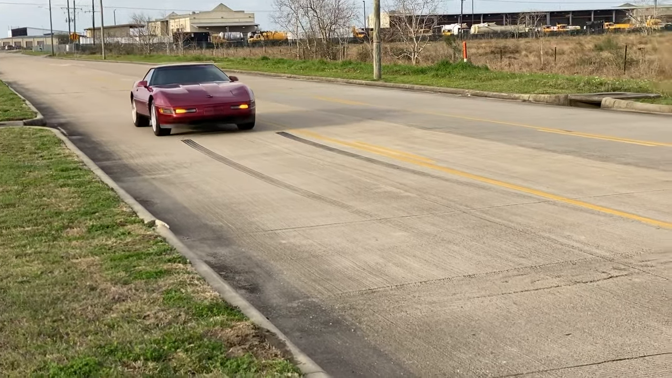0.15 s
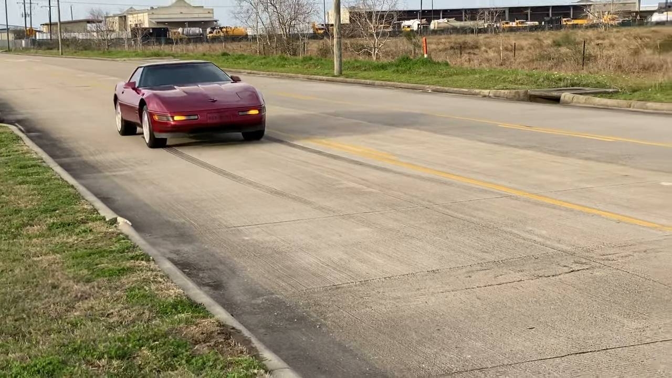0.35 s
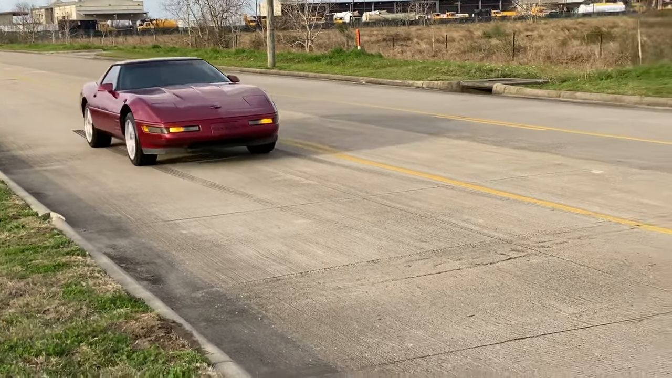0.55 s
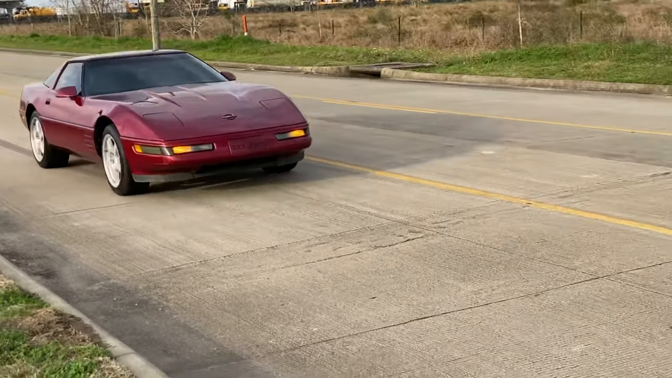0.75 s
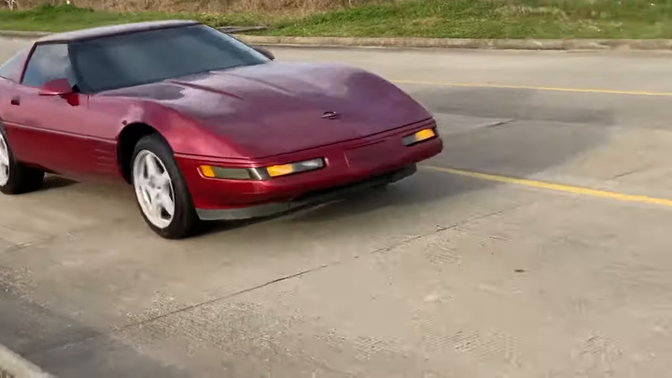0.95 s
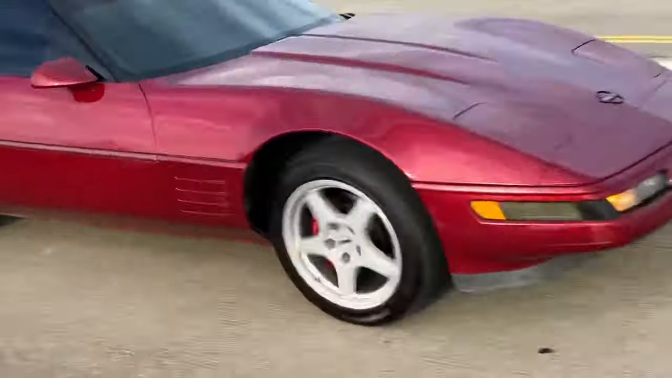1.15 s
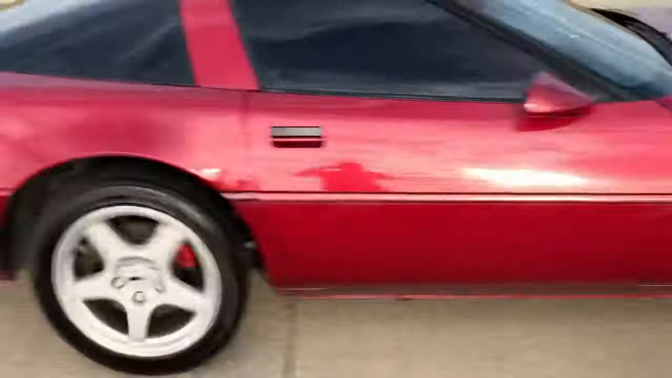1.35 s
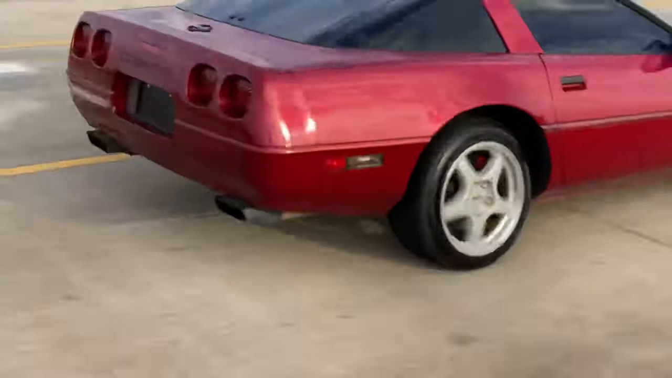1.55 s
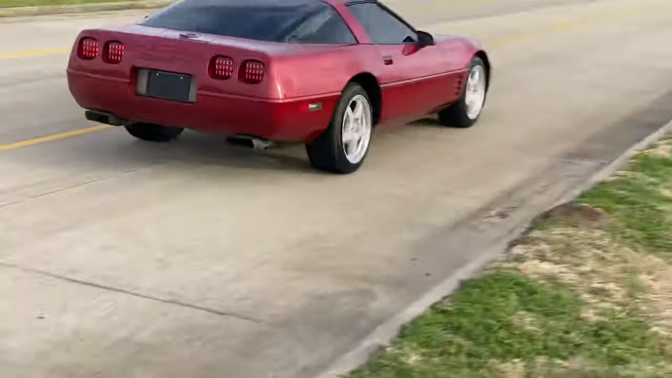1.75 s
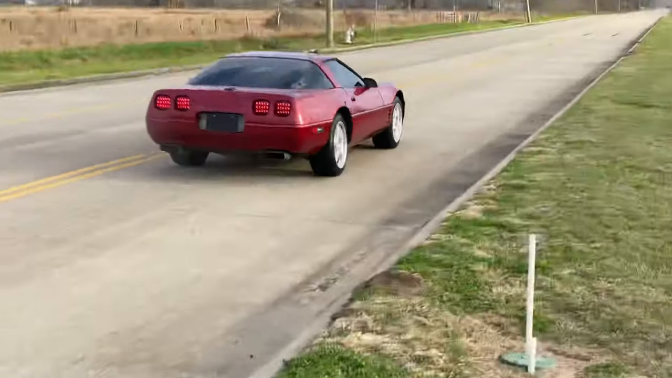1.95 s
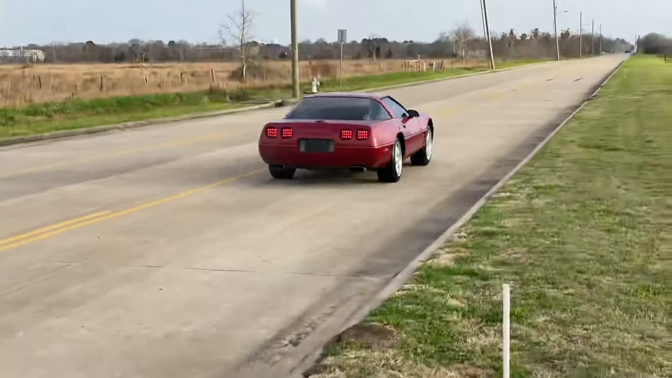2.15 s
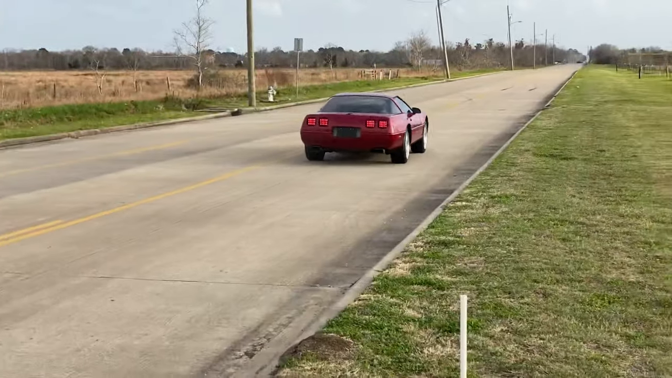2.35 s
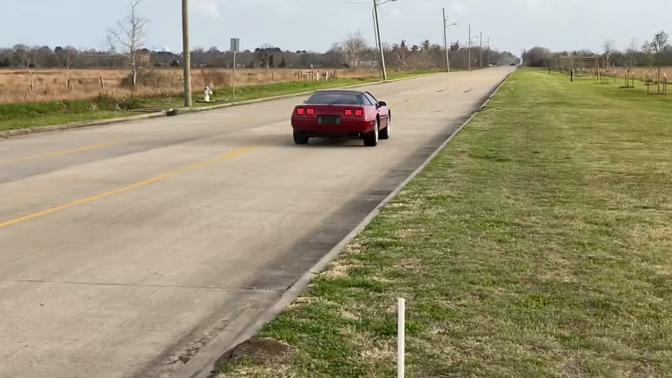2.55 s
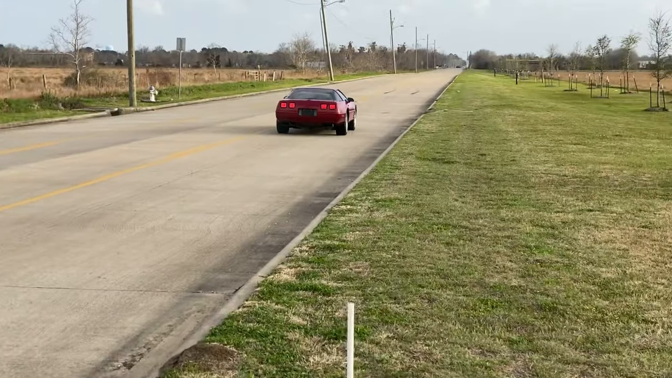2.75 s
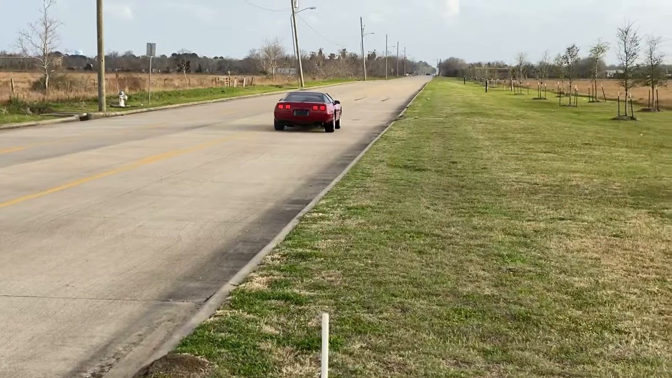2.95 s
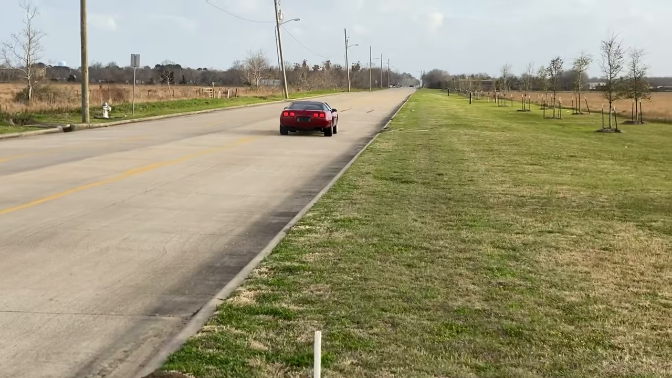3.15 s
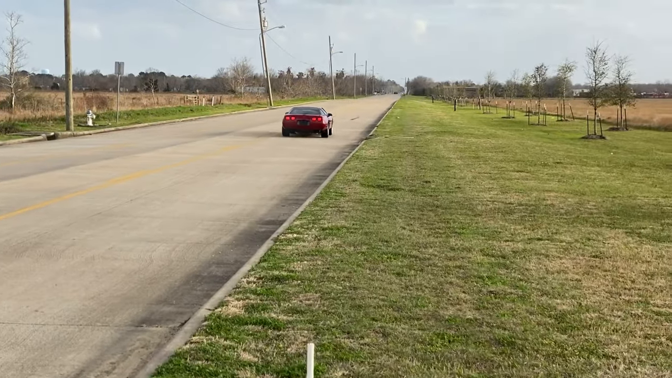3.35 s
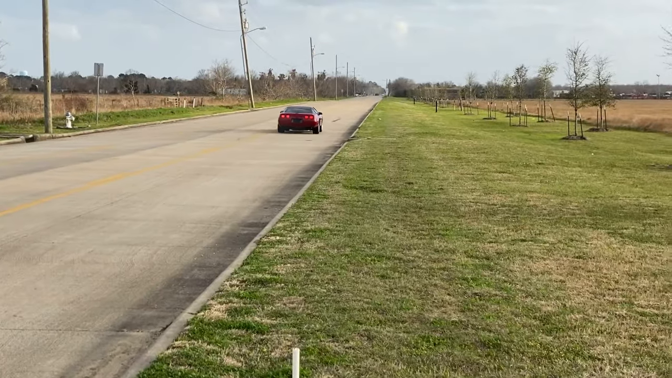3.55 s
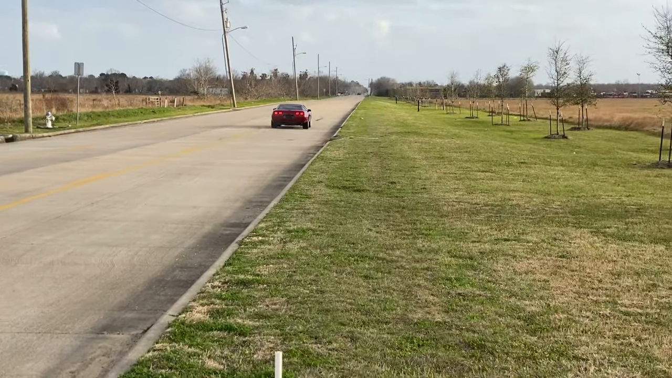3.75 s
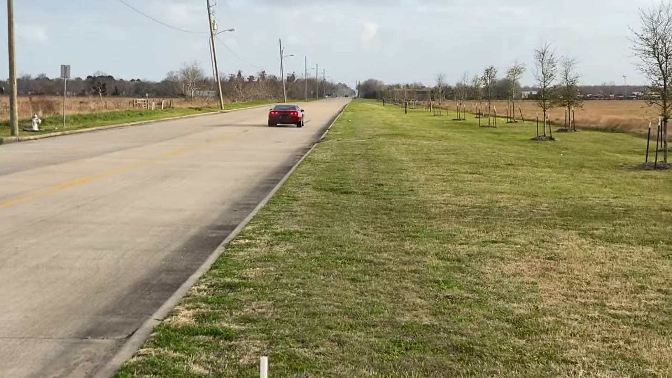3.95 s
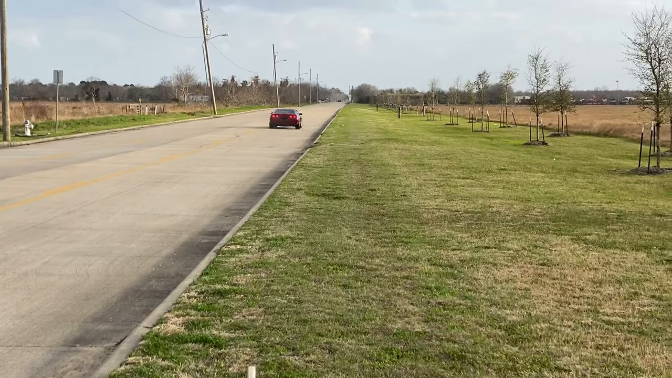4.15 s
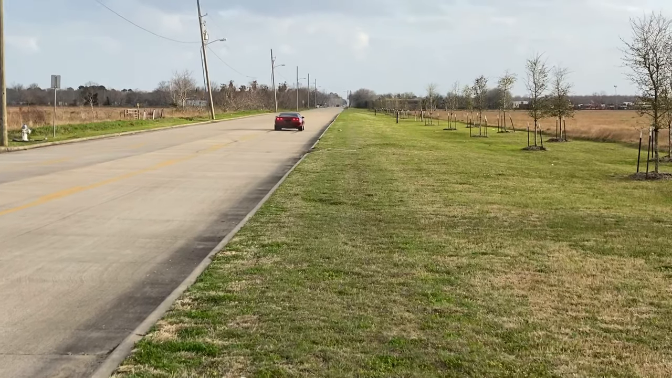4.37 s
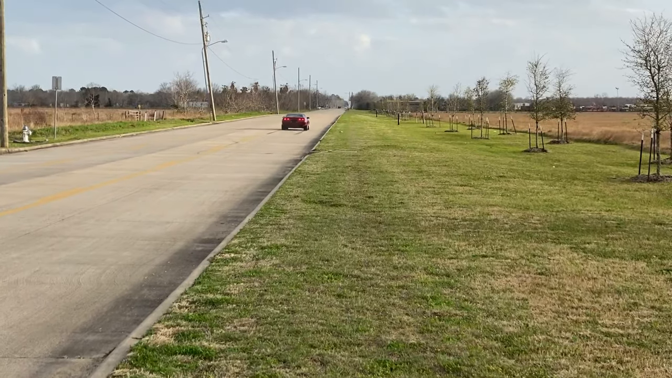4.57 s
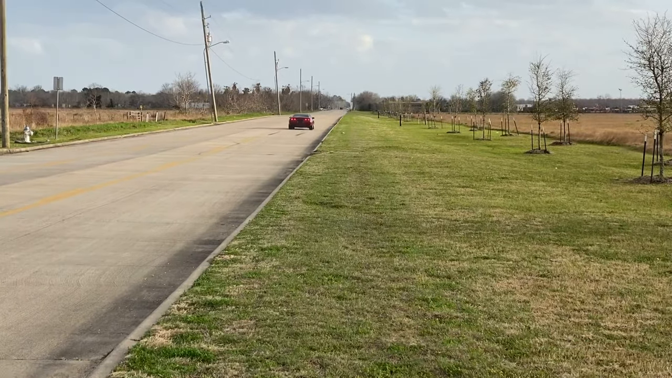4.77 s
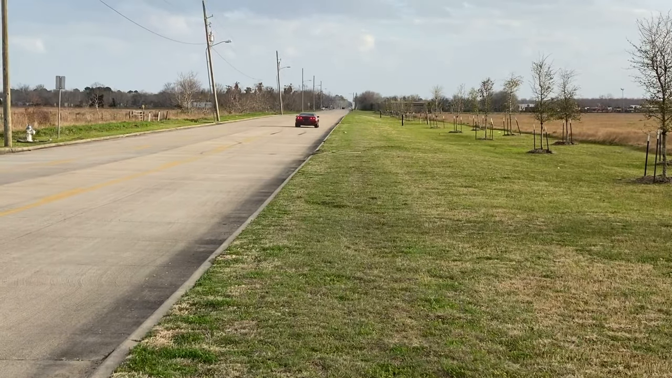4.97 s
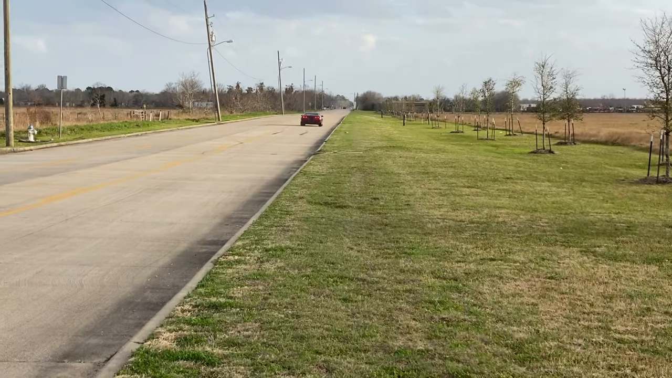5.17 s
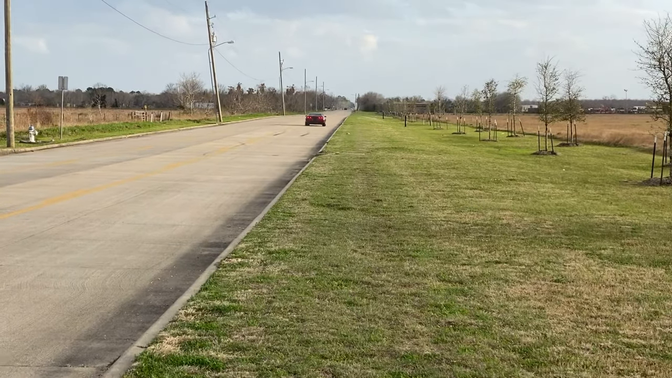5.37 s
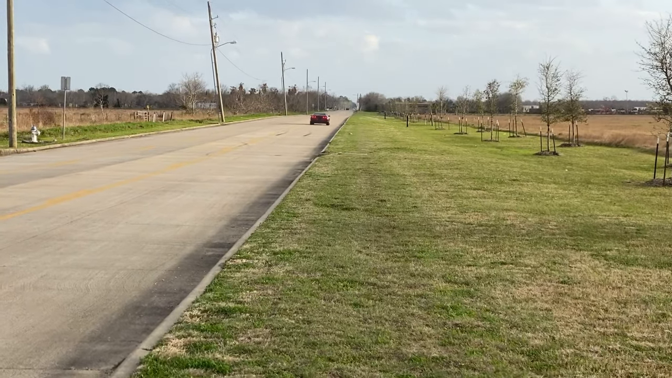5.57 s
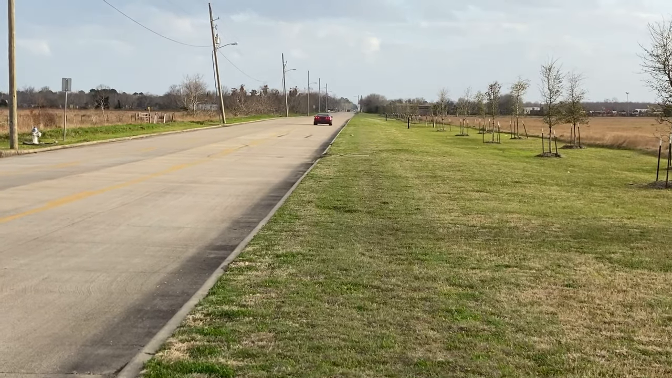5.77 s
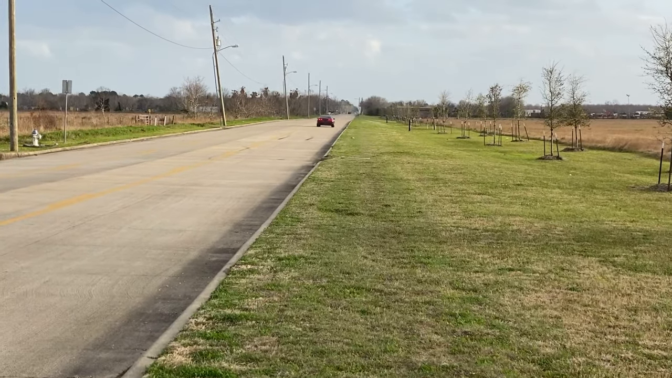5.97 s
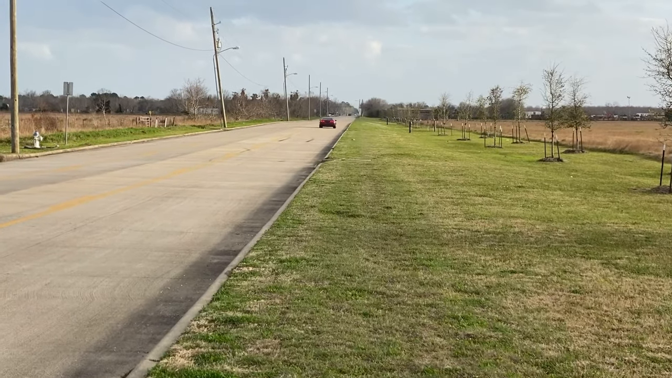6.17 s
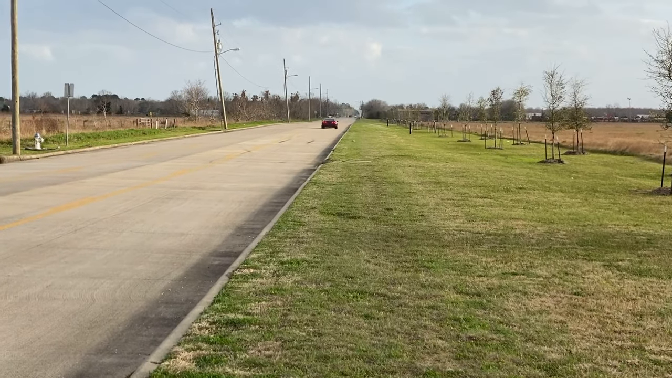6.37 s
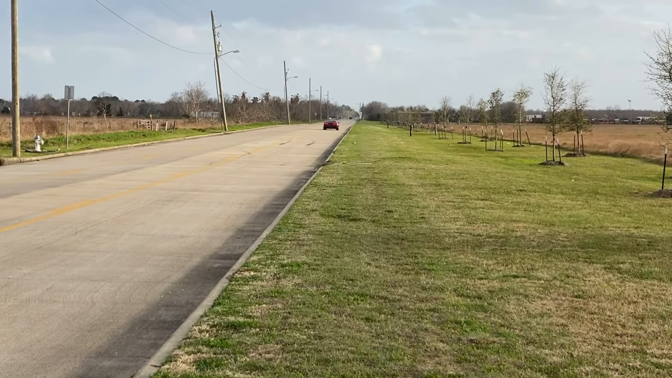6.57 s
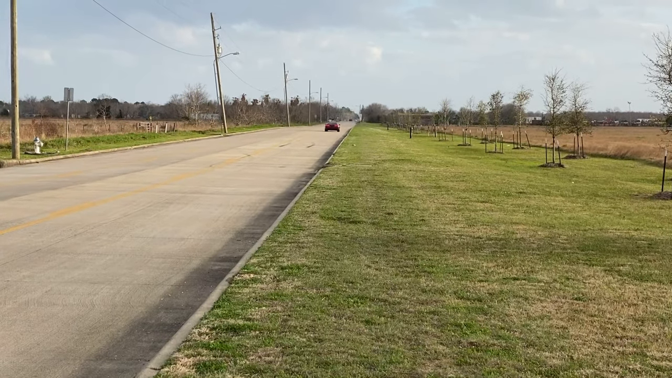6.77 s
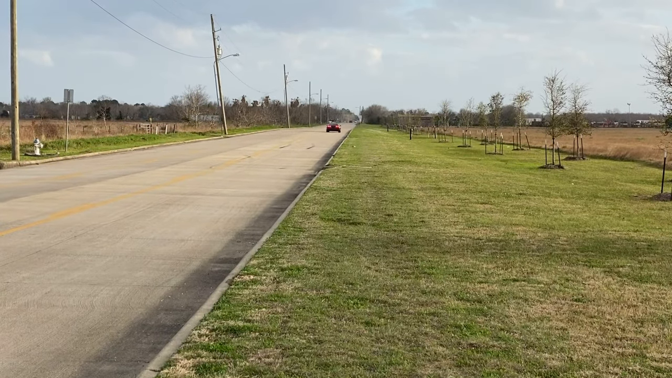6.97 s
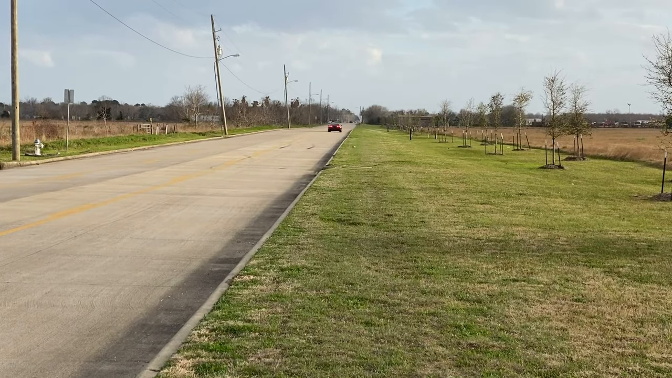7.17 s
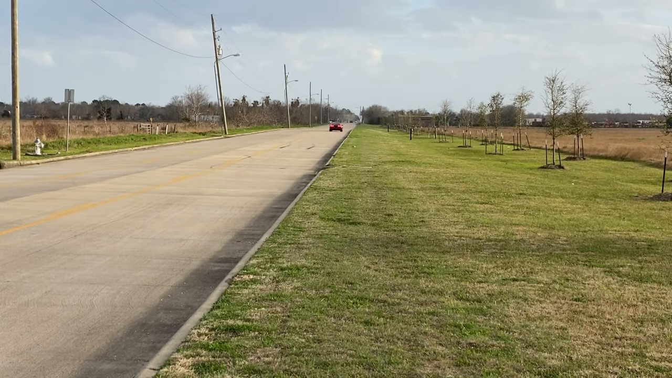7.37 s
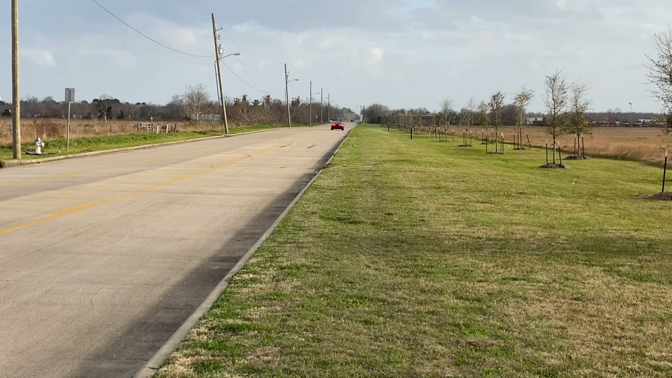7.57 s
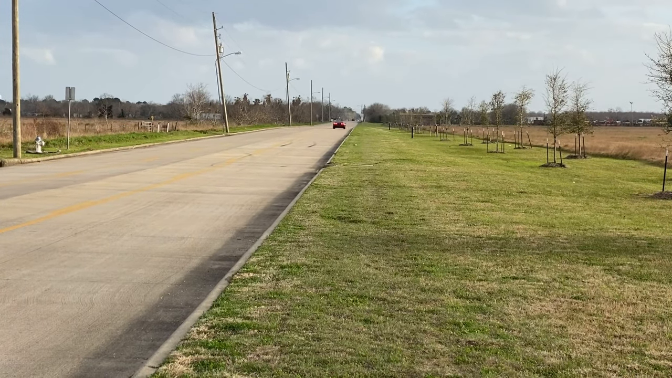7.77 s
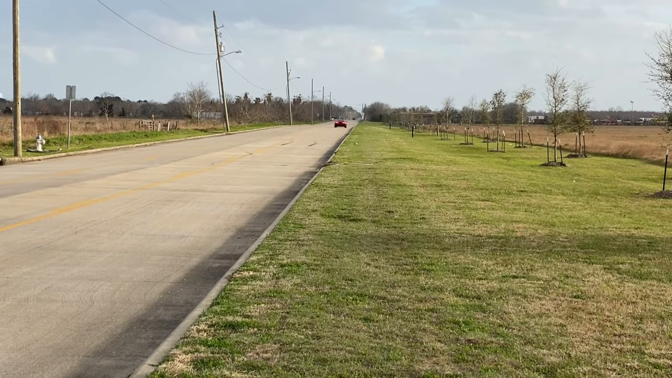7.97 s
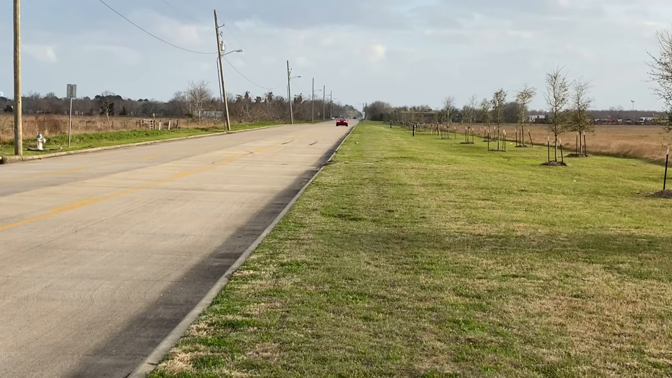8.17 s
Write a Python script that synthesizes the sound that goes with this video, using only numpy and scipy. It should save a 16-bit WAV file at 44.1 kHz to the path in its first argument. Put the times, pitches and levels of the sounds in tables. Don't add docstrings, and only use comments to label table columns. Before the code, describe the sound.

Outdoors beside an open concrete road, a V8 car with unmuffled pipes accelerates toward a stereo microphone, its deep hum and hard firing cracks rising in pitch. It sweeps past at just over a second with tyre hiss and a puff of wind. Pitch drops, two shifts bring sharp pops, and the roar shrinks into the distance. Finally the throttle closes and the engine coasts unevenly, crackling and backfiring.

```python
import sys
import numpy as np
from scipy import signal
from scipy.fft import rfft, irfft, next_fast_len
from scipy.io import wavfile
from scipy.ndimage import uniform_filter1d

SR = 44100
rng = np.random.default_rng(int(sys.argv[2]) if len(sys.argv) > 2 else 0)


def gain_from_decibels(decibels):
    exponent = np.asarray(decibels, float) / 20
    return 10 ** exponent


def unload_audio(sound):
    columns = np.transpose(np.atleast_2d(sound))
    steps = np.round(np.clip(columns, -1, 1) * 32767)
    wavfile.write(sys.argv[1], SR, steps.astype(np.int16))


N = 362485
WIDE = next_fast_len(N + 8192)


def evened(x):
    return x / np.sqrt(np.mean(x ** 2) + 1e-20)


def steady(x, s=0.047):
    size = int(s * SR)
    power = uniform_filter1d(uniform_filter1d(x ** 2, size), size)
    return x / np.sqrt(abs(power) + 1e-14)


def read(points, hz):
    f, value = np.transpose(points)
    return np.interp(np.log(hz + 1), np.log(f + 1), value)


def along(rows):
    s, *columns = np.transpose(rows)
    return [np.interp(np.arange(N) / SR, s, c) for c in columns]


def bell(s, length):
    return np.exp(-((np.arange(N) / SR - s) / length) ** 2)


def shaped(x, points):
    gain = gain_from_decibels(read(points, np.fft.rfftfreq(WIDE, 1 / SR)))
    return irfft(rfft(x, WIDE) * gain, WIDE)[:N]


def causal(points):
    log_gain = np.log(gain_from_decibels(read(points, abs(np.fft.fftfreq(4096, 1 / SR)))))
    return np.fft.ifft(np.exp(signal.hilbert(log_gain).conj())).real[:2048]


def band(x, lo_hz, hi_hz):
    sos = signal.butter(4, [lo_hz, hi_hz], "band", fs=SR, output="sos")
    return steady(signal.sosfilt(sos, x))


def wander(hz, count):
    rate = 100
    frames = rng.standard_normal((count, int(N / SR * rate) + 3, 2)) @ [1, 1j]
    frames = signal.lfilter([1], [1, -np.exp(-2 * np.pi * hz / rate)], frames, axis=1)
    at = np.arange(0, N, 8) * rate / SR
    return [np.interp(at, np.arange(len(f)), f / np.sqrt(np.mean(abs(f) ** 2))) for f in frames]


# t/s, f/Hz (engine cycles)
SPEED = [(0.0, 35.3), (0.18, 36.6), (0.62, 43.4), (1.2, 50.4), (1.31, 49.4), (1.64, 39.3), (1.845, 45.2),
         (1.95, 40.5), (2.28, 33.0), (2.39, 34.4), (3.31, 39.0), (4.25, 43.1), (4.37, 45), (4.97, 34.5),
         (5.27, 29), (5.45, 29.8), (7.85, 27.4), (8.22, 26.7)]
MARKS = [
    .215,
    2.9875,
    4.206,
    6.577,
    7.68,
]


def crank():
    turns = np.cumsum(along(SPEED)[0]) / SR
    marked = turns[(np.array(MARKS) * SR).astype(int)]
    drift = np.unwrap(marked % 1, period=1)
    return turns - np.interp(np.arange(N) / SR, MARKS, drift) + 1


EVEN_SHARE = .18
# start t/s, end t/s, added share of noise/0-1
BURBLES = [
    (-.2, .15, .22),
    (1.2, 1.36, .4),
    (1.2, 2.0, .06),
    (1.68, 1.76, .25),
    (4.3, 4.5, .5),
    (4.97, 5.45, .4),
    (5.45, 5.88, .2),
    (5.88, 6.45, .36),
]


def raggedness():
    t, edge, ragged = np.arange(N) / SR, .05, EVEN_SHARE
    for a, b, share in BURBLES:
        ragged = ragged + np.interp(t, [a - edge, a + edge, b - edge, b + edge], [0, share, share, 0])
    return ragged


PASS_S = 1.28
# t/s, level/dB, rasp/dB
DRIVE = [(0, -9.5, -16.5), (.17, -15.5, -10), (.45, -12.5, -18), (1.05, -11.5, -19), (1.4, -13, -15.5),
         (1.6, -17.5, -10), (1.9, -18.5, -11.5), (2.2, -22, -15), (2.75, -26.5, -14.5), (3.05, -28, -14),
         (4.25, -30, -13.5), (4.55, -31.5, -4), (4.92, -34, -7), (5.04, -41.5, -19), (5.3, -40, -25),
         (5.75, -40, -20), (6.42, -34, -10), (6.8, -36.5, -18), (8.22, -36, -10.5)]
# t/s, length/s, level change/dB, rasp change/dB
STUMBLES = [(1.241, 0.019, -2, -5), (1.3, 0.038, 3.5, -4), (1.328, 0.013, -8.5, 0.5), (1.657, 0.042, 1, -2),
            (1.731, 0.012, 7, -4), (1.717, 0.012, 4, -10.5), (1.173, 0.037, -2, 4.5), (.62, 0.1, 0.5, 1),
            (4.38, 0.029, -4, -7.5), (5.39, 0.38, 4, 10), (7.683, 0.088, -0.5, 3.5), (5.6, 0.093, -1, -4),
            (3.2, 0.05, 0, -3), (4.478, 0.017, -1.5, -14), (5.898, 0.0098, 13, -6),
            (5.993, 0.059, 4.5, 4.5), (6.165, 0.067, -0.5, 5.5), (6.179, 0.011, 11, -2),
            (6.252, 0.026, 3, -8)]
# t/s, index of the eight drone colours
ASPECT = [(.15, 0), (.45, 1), (.8, 1), (1.0, 2), (1.25, 2), (1.4, 3), (1.7, 3), (1.9, 4), (2.2, 4),
          (2.5, 5), (4.4, 5), (4.55, 6), (4.97, 6), (5.15, 7)]
BARK_DB = [
    8.5,
    8,
    6.5,
    9.5,
    18.5,
    2.5,
    0.5,
    -8,
]


def levels():
    (level_db, rasp_db), (aspect,) = along(DRIVE), along(ASPECT)
    bumps = np.array([bell(s, length) for s, length, *_ in STUMBLES])
    level_db, rasp_db = np.array([level_db, rasp_db]) + np.transpose(STUMBLES)[2:] @ bumps
    t = np.arange(N) / SR
    since = t - PASS_S
    far_db = 39 * (1 - np.exp(-abs(since) / 5.77)) + 5.5 * np.clip(-since, 0, 1)
    bark_db = rasp_db + np.interp(aspect, range(len(BARK_DB)), BARK_DB)
    bark_db -= 1.5 * raggedness()
    bark_db += 10.5 * (1 + np.tanh((t - 6.94) / 0.16)) / 2
    bark_db -= 20.5 * bell(1.92, 0.27)
    air_db = rasp_db - 13 - far_db
    air_db -= 4.5 * np.clip(aspect - 6, 0, 1)
    return level_db, bark_db, rasp_db, air_db


# order (multiple of the engine cycle), level/dB
START = [(1, -62), (2, -16), (3, -3), (4, 0.5), (5, 0.5), (6, -10), (7, -5), (8, -2.5), (9, -16),
         (10, -5.5), (11, -11), (12, -5.5), (13, -4), (14, -7), (15, -12), (16, -52), (17, -9), (18, -12)]
# order, level/dB
FRONT = [(1, -25), (2, -9.5), (3, 5.5), (4, -3.5), (5, -3), (6, -5), (7, -4.5), (8, 0.5), (9, 4.5),
         (10, -2.5), (11, -3), (12, 2), (13, -4.5), (14, -2.5), (15, -46), (16, -36), (17, -8.5), (18, -42),
         (19, -45), (20, -6.5)]
# order, level/dB
NOSE = [(1, -26), (2, -14), (3, 3.5), (4, -0.5), (5, -10), (6, -5.5), (7, -2.5), (8, -3.5), (9, -1.5),
        (10, -9.5), (11, -12.5), (12, -9), (13, -20), (14, -9), (15, -36), (16, -26), (17, -17), (18, -26),
        (19, -15), (20, -19), (21, -26), (22, -22)]
# order, level/dB
BESIDE = [(1, -30), (2, -36), (3, 0), (4, -31), (5, -1), (6, -1), (7, -10), (8, 1), (9, -1.5), (10, -9),
          (11, -6), (12, -16.5), (13, -16), (14, -32), (15, -11), (16, -14.5), (17, -54), (18, -13.5)]
# order, level/dB
FLANK = [(1, -32), (2, -20), (3, -4.5), (4, -1), (5, -6), (6, -5), (7, -1.5), (8, 3), (9, 5.5), (10, -0.5),
         (11, -4), (12, -4), (13, 4), (14, 7), (15, -21), (16, -6), (17, -5), (18, -9), (19, -2), (20, -7),
         (21, -35), (22, -5)]
# order, level/dB
REAR = [(1, -31), (2, -22), (3, -18), (4, -3), (5, -12), (6, -7), (7, -10), (8, 0), (9, -7), (10, -1),
        (11, -3), (12, -1), (13, -9), (14, -3), (15, -17), (16, -9), (17, -8), (18, -10), (19, -13),
        (20, -13), (21, -12), (22, -11), (23, -13), (24, -13), (25, -12), (26, -15), (27, -15), (28, -17)]
# order, level/dB
LIFT = [(1, -34), (2, -24), (3, -27.5), (4, -18), (5, -15), (6, -9.5), (7, -6.5), (8, 0), (9, -30),
        (10, -11), (11, -7.5), (12, -20), (13, -14), (14, -5.5), (15, -12), (16, -9), (17, -12), (18, -15),
        (19, -12), (20, -14), (21, -15.5), (22, -12), (23, -17), (24, -15), (25, -10), (26, -19), (27, -17),
        (28, -27), (29, -13.5), (30, -26), (31, -24), (32, -27), (33, -27), (34, -28), (35, -25), (36, -27)]
# order, level/dB
COAST = [(1, -28), (2, -13), (3, -12), (4, -10), (5, -12), (6, -2), (7, -11), (8, 0), (9, -19), (10, -17),
         (11, -16), (12, -12), (13, -20), (14, -19), (15, -5), (16, -5), (17, -14), (18, -13), (19, -18),
         (20, -13), (21, -22), (22, -22), (23, -10), (24, -21), (25, -21), (26, -12), (27, -17), (28, -13),
         (29, -19), (30, -19), (31, -14), (32, -18), (33, -19), (34, -14), (35, -13), (36, -16), (37, -17),
         (38, -14), (39, -16), (40, -21), (41, -22), (42, -23), (43, -23), (44, -23), (45, -23), (46, -22),
         (47, -26), (48, -20)]
# f/Hz, level/dB
MOUTH = [(120, 0), (170, 1), (300, 1), (480, 2), (570, -1), (750, 2), (1000, 3)]


def drone(turns, bark_db):
    tracks = (*along(ASPECT), raggedness(), *along(SPEED), turns, bark_db)
    aspect, ragged, cycle_hz, turns, bark_db = (v[::8] for v in tracks)
    colours = [dict(c) for c in (START, FRONT, NOSE, BESIDE, FLANK, REAR, LIFT, COAST)]
    coasting = np.clip(aspect - 6, 0, 1)
    driving = np.clip(6 - aspect, 0, 1)
    t = np.arange(len(cycle_hz)) * 8 / SR
    out = np.zeros(len(t))
    for k, chance in enumerate(wander(22., count=48), start=1):
        level_db = np.interp(aspect, range(8), [c.get(k, -45) for c in colours])
        level_db += read(MOUTH, k * cycle_hz)
        level_db += (k > 26) * coasting * (0.67 * bark_db + 11.5)
        sway = np.sin(rng.uniform(3, 9) * t + rng.uniform(0, 6))
        level_db += 3 * sway * (1 - coasting)
        level_db += (9 <= k <= 11) * coasting * 14 * (ragged - EVEN_SHARE) * 2
        late = rng.uniform(0, 4.6) * (1 - .5 * coasting + (k > 16) * .45 * coasting)
        roar = .3 * np.clip(k * cycle_hz / 400 - 1, 0, 1) * driving
        blur = np.minimum(ragged + roar, 1)
        wave = np.exp(1j * (2 * np.pi * k * turns - late))
        out += gain_from_decibels(level_db) * (((1 - blur) + blur * chance) * wave).real
    return steady(signal.resample_poly(out, 8, 1, window=("kaiser", 10))[:N])


# cylinder, start t/s, end t/s, lift/dB
LOUD = [(0, -.1, .45, 12), (0, .45, .8, 8), (3, -.1, .5, 7), (6, .3, 1.3, 6), (0, 1.33, 2.1, 11),
        (3, 1.33, 2.15, 11), (5, 1.33, 1.7, 11), (0, 2.1, 4.35, 13), (6, 1.75, 2.7, 7), (4, 2.0, 3.55, 9),
        (3, 3.5, 4.3, 6), (0, 4.4, 5.0, 11), (3, 4.4, 5.0, 9), (5, 4.5, 5.0, 10), (3, 5.4, 6.65, 13),
        (6, 5.44, 6.2, 13), (0, 5.4, 6.2, 6), (0, 6.36, 8.09, 12), (4, 8.07, 8.4, 6), (5, 6.3, 6.6, 7),
        (6, 6.7, 7.4, 6), (4, 6.7, 8.4, 9), (1, 7.5, 8.4, 5), (3, 5.0, 5.4, 8), (0, 5.12, 5.4, 8)]


def loudness(order, s):
    level_db, edge = -15, .04
    for k, a, b, lift_db in LOUD:
        held = np.interp(s, [a - edge, a + edge, b - edge, b + edge], [0, 1, 1, 0])
        level_db = level_db + lift_db * (order % 8 == k) * held
    return level_db


# t/s, firings late
SLIP = [(0, .2), (.4, 0), (.75, -.2), (1.33, -.6), (1.68, .4), (1.74, -1), (2.2, 0), (4.3, 0), (4.5, -1),
        (4.95, -.3), (5.4, .3), (6.1, 0), (6.25, -1), (6.42, 0)]
# t/s, power of the crack size
BARK_EVEN = [
    (6.5, 1),
    (6.9, .7),
]
# t/s, f/Hz
RING = [(0, 2380), (.65, 2740), (.9, 2470), (1.2, 2500), (1.4, 2990), (1.7, 3000), (1.9, 2430), (2.2, 2860),
        (2.36, 3030), (2.5, 2020), (2.72, 3030), (3.05, 2840), (3.3, 2220), (4.3, 2090), (4.55, 2500),
        (4.65, 2780), (4.88, 3020), (5.0, 2160), (5.4, 2240), (5.48, 3040), (5.95, 2980), (6.05, 2150),
        (6.75, 2130), (7.0, 2720), (7.42, 3060), (7.52, 2400), (7.8, 2350), (7.87, 2850), (8.03, 2880),
        (8.1, 2180)]
# f/Hz, level/dB
PIPE = [(350, -13), (600, -5), (849, -13.5), (946, -7), (1300, -12.5), (1460, -8.5), (1570, -4.5),
        (2020, 4), (2480, -4), (2950, 1.5), (3950, 1.5), (6580, -17.5), (8000, -24), (10400, -44),
        (17600, -120)]


def firings(turns, hiss):
    turns = turns - along(SLIP)[0] / 8
    at = np.flatnonzero(np.diff(np.floor(8 * turns)))
    order = np.floor(8 * turns[at + 1]).astype(int)
    spread, slip, mood, pitch = np.moveaxis(rng.standard_normal((330, 8, 4)), 2, 0)
    mood, pitch = (evened(uniform_filter1d(v, size=6, axis=0)) for v in (mood, pitch))
    size = gain_from_decibels(loudness(order, at / SR) + (1.6 * spread + 1.6 * mood).ravel()[order])
    at = np.clip(at + (4 * slip.ravel()[order]).astype(int), 0, N - 1)

    shocks, barks = np.zeros(N + 1), np.zeros(N)
    shocks[at] = size
    barks[at] = size ** along(BARK_EVEN)[0][at]

    rings, t = np.zeros(N + 201), np.arange(200) / SR
    ring_hz = along(RING)[0][at] * np.exp(.08 * pitch + 0.14 * slip).ravel()[order]
    ringing = np.sin(2 * np.pi * ring_hz[:, None] * t) * np.exp(-t / .0012)
    np.add.at(rings, at[:, None] + np.arange(200), size[:, None] * ringing)
    ring = evened(rings[:N])

    puffs = signal.lfilter([1], [1, -np.exp(-1 / (.002 * SR))], shocks) * rng.standard_normal(N + 1)
    pipe = causal(PIPE[:-2] + [(12000, -32.5), (16000, -31.0)])
    beat, bark, breath = (evened(signal.oaconvolve(evened(v[:N]), pipe)[:N]) for v in (shocks, barks, puffs))
    rush = evened(signal.oaconvolve(rng.standard_normal(N), pipe)[:N])

    share = np.clip(hiss, 0, 1)
    tyre_roar = .3 * bell(PASS_S, 1)
    low = (1 - share) * bark + (share + tyre_roar) * rush
    high = (1 - share) * beat + share * rush
    high += (1 - share) * (.9 * breath + ring - .35 * beat)
    return low, high


# t/s, delay/ms
ECHO = [
    (0, 0.34),
    (1.2, 0.39),
    (1.4, 0.4),
    (1.65, 0.17),
    (1.8, 0.16),
    (2.2, 0.36),
    (3, 0.34),
    (4.4, 0.37),
    (8.22, 0.41),
]


def echoed(x):
    late = along(ECHO)[0] * SR / 1000
    return x + 0.4 * np.interp(np.arange(N) - late, np.arange(N), x)


def shimmered(x):
    hz, s, z = signal.stft(x, SR, nperseg=512)
    ring_hz = np.interp(s, *np.transpose(RING))
    swell_db = 4 * np.exp(-((hz[:, None] - ring_hz) / 420) ** 2)
    patches = rng.standard_normal(z.shape)
    for _ in range(2):
        patches = uniform_filter1d(uniform_filter1d(patches, size=5, axis=0), size=20, axis=1)
    return signal.istft(z * gain_from_decibels(1.5 * evened(patches) + swell_db), SR, nperseg=512)[1][:N]


# t/s, share/0-1
HISS = [(.15, .4), (.5, .5), (.8, .6), (1.25, .68), (1.4, .36), (2.1, .34), (3.1, .46), (4.4, .5),
        (4.55, .36), (4.95, .3), (5.1, .16), (6.6, .18), (7, .24)]
# t/s, level/dB
PANEL = [
    (.3, -24),
    (.72, -15),
    (.8, -11),
    (1.05, -11),
    (1.25, -15),
    (1.4, -26),
    (2, -50),
]


def car():
    drone_db, bark_db, crack_db, air_db = levels()
    turns = crank()
    beats, gas = firings(turns, along(HISS)[0])
    top = gain_from_decibels(bark_db) * band(beats, 654, 1426)
    top += gain_from_decibels(crack_db + 4.0) * band(shimmered(echoed(gas)), 1300, 7700)
    top += gain_from_decibels(along(PANEL)[0]) * band(gas, 1633, 1778)
    top += gain_from_decibels(air_db + 14.5) * band(gas, 7040, 15300)
    top += gain_from_decibels(air_db + 9.0 + 0.18 * (air_db + drone_db + 29)) * band(gas, 12500, 15200)
    return -gain_from_decibels(drone_db) * (gain_from_decibels(1.77) * drone(turns, bark_db) + top)


# f/Hz, level/dB
FIELD = [(35, -46), (60, -16), (239, -1), (449, -5), (542, -8), (1060, -16), (1230, -23), (2900, -22),
         (9000, -56), (11700, -86), (19800, -120)]


def background():
    return gain_from_decibels(-47) * evened(shaped(rng.standard_normal(N), FIELD))


# f/Hz, level/dB
WIND_COLOUR = [(15, -30), (30, -10), (50, 11.5), (90, 9.5), (200, 5), (400, -22), (1500, -80), (6000, -140)]
# t/s, length/s, level/dB
GUSTS = [(.15, 0.34, -32), (1.0, 0.27, -38), (1.237, 0.1, -25.5), (1.555, 0.083, -24), (1.764, 0.15, -22),
         (3.695, 0.44, -47.5), (4.498, 0.14, -49), (4.85, 0.26, -48.5), (5.916, 0.02, -31),
         (6.8, 0.38, -48), (7.4, 0.55, -45.5), (8.15, 0.29, -36)]


def wind():
    a, b = (evened(shaped(v, WIND_COLOUR)) for v in rng.standard_normal((2, N)))
    calm = gain_from_decibels(-91)
    strength = calm + sum(gain_from_decibels(db) * bell(s, length) for s, length, db in GUSTS)
    return strength * np.array([a + .17 * b, a - .17 * b])


# t/s, peak level/dB, thump against it/dB, ring f/Hz
BACKFIRES = [(1.7207, -22, -5, 2300), (2.2236, -22, -14, 3260), (2.253, -24, -14, 3080),
             (2.284, -25, -14, 3140), (2.4596, -36, -17, 4700), (4.4052, -31, -12, 2140),
             (4.4287, -29.5, -12, 2160), (4.4985, -30, -15, 2210), (5.1415, -37.5, -10, 2200),
             (5.264, -38, -8, 2200), (5.3176, -41, -10, 3380), (5.4239, -46, -4, 2270),
             (5.987, -34, -10, 3030), (6.2954, -37, -8, 2960), (6.3099, -32, -7, 3150),
             (6.4516, -30, -5, 2220), (6.4865, -29, -8, 2200), (8.1372, -41, -8, 2230),
             (2.9072, -26.5, -18, 3600), (2.934, -30, -14, 2230), (2.96, -20.5, -20, 3140),
             (2.9883, -23, -21, 3000), (3.0148, -20.5, -23, 2830), (3.0402, -23.5, -13, 2270),
             (4.2064, -25.5, -8, 2020), (5.2844, -36, -10, 2240), (5.8826, -37, 24, 2160),
             (5.933, -50, 1, 2830), (6.121, -33, 11, 2230), (6.1744, -17, -23, 2370),
             (6.2834, -31, 6, 1900), (6.3812, -27.5, -16, 2200), (6.418, -24.5, 13, 2240),
             (6.5424, -28, -16, 2200), (6.5768, -28, -16, 2400), (6.6114, -30.5, -7, 2200)]
# t/s, peak level/dB, ring f/Hz
CRACKLE = [(5.0175, -27, 2140), (5.1627, -42, 2000), (5.1831, -28, 2260), (5.1994, -40, 2290),
           (5.2285, -39, 2180), (5.2415, -36, 2130), (5.2984, -28, 2180), (5.3467, -37, 2270),
           (5.3582, -29, 2130), (5.3842, -39, 2210), (5.4515, -24, 2930), (5.464, -26, 2870),
           (5.4979, -31, 3240), (5.5648, -28, 2270), (6.3679, -27, 2090), (6.4033, -25, 2170),
           (6.4378, -19, 2210), (6.5076, -23, 2170), (6.5211, -26.5, 2140), (8.0825, -21, 1940),
           (8.1, -30, 2190), (8.1728, -29, 2480), (8.1944, -25, 1900)]


def backfires():
    out, t = np.zeros(N), np.arange(3000) / SR
    small = [(s, db - 13, -12, hz) for s, db, hz in CRACKLE]
    for s, peak_db, thump_db, hz in BACKFIRES + small:
        spit = signal.lfilter([.1, .2, .1], [1, -.9, .3], rng.standard_normal(len(t)))
        crack = np.sin(2 * np.pi * hz * t) + .4 * spit
        crack *= np.exp(-t / .0009) * (1 - np.exp(-t / .0003))
        thump = np.sin(2 * np.pi * 200 * t) * t / 0.0021 * np.exp(1 - t / 0.00096)
        pop = gain_from_decibels(peak_db + 14.0) * crack - gain_from_decibels(peak_db + min(thump_db, 18) - 2.0) * thump
        part = out[round(s * SR):][:len(t)]
        part += pop[:len(part)]
    return signal.sosfilt(signal.butter(2, 12000., fs=SR, output="sos"), out)


# t/s, f/Hz, depth/dB
NULL = [
    (0, 1300, -11),
    (.55, 1330, -12),
    (.75, 1390, -15),
    (1.15, 1490, -23),
    (1.3, 1520, 1),
    (1.45, 1500, -8),
    (2.4, 1530, -16),
    (2.8, 1560, -0.5),
    (8.22, 1650, -2),
]


def nulled(x):
    hz, s, z = signal.stft(x, SR, nperseg=2048)
    at, centre_hz, depth_db = np.transpose(NULL)
    width_hz = 69
    dip = np.exp(-((hz[:, None] - np.interp(s, at, centre_hz)) / width_hz) ** 2)
    return signal.istft(z * gain_from_decibels(np.interp(s, at, depth_db) * dip), SR, nperseg=2048)[1][:N]


# f/Hz, level/dB
LEAN = [(100, 0.1), (300, -0.4), (600, 1.5), (1300, 3), (2200, 0)]
# f/Hz, level/dB
SCATTER = [(60, 2), (150, -43.5), (400, -10), (900, -14.5), (1400, 0), (2200, -11.5), (5000, -67),
           (9000, -58)]
# f/Hz, level/dB
DIFFUSE = [(60, -14), (250, -21), (600, -31), (1300, -32), (2500, -14.5), (6000, -30), (9000, -38),
           (15000, -20)]


def ports(x):
    hz = np.fft.rfftfreq(WIDE, 1 / SR)
    lag_s = .000292 * (hz > 7700)
    lag = np.exp(1j * np.pi * hz * lag_s) * gain_from_decibels(read(LEAN, hz) / 2)
    whole = rfft(x, WIDE)
    side = irfft(1j * whole * gain_from_decibels(read(SCATTER, hz)), WIDE)[:N] * (0.42 + 0.4 * bell(1, 0.78))
    taps = rng.standard_normal(4000) * np.exp(-np.arange(4000) / 900)
    reflections = rfft(taps / np.linalg.norm(taps), WIDE) * gain_from_decibels(read(DIFFUSE, hz))
    side += irfft(whole * reflections, WIDE)[:N]
    middle = irfft(rfft(nulled(x), WIDE) * np.array([lag, 1 / lag]), WIDE)[:, :N]
    return middle + np.array([side, -side])


def scene():
    return ports(car() + background() + backfires()) + wind()


def roll_off(x):
    return signal.sosfilt(signal.butter(12, 16100, fs=SR, output="sos"), x)


def record(dry):
    mix = 1.29 * np.tanh(dry / 1.333)
    return roll_off(mix)


dry = scene()
out = record(dry)
unload_audio(out)
```